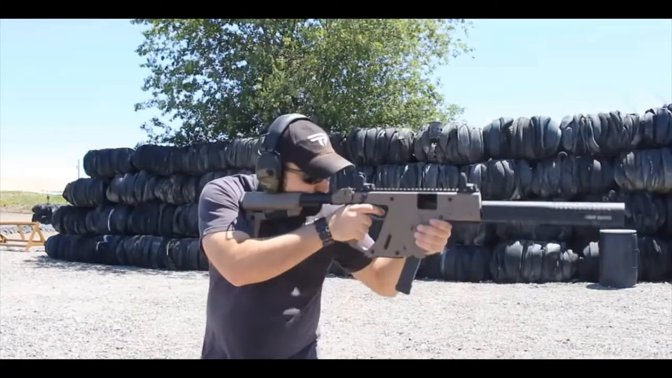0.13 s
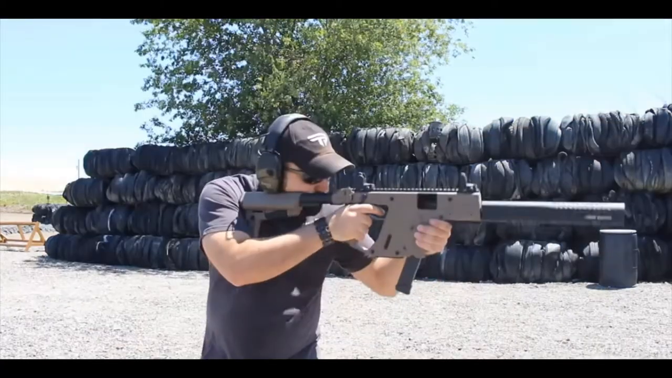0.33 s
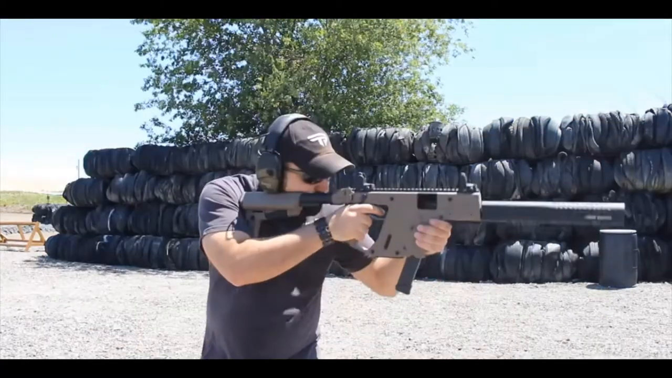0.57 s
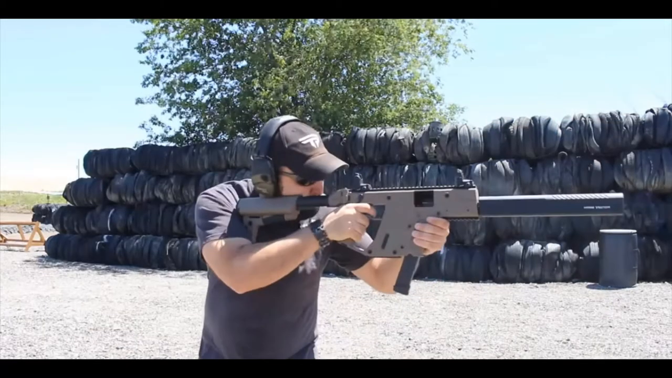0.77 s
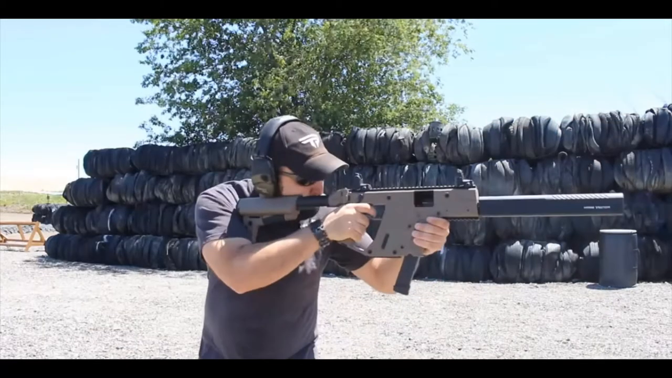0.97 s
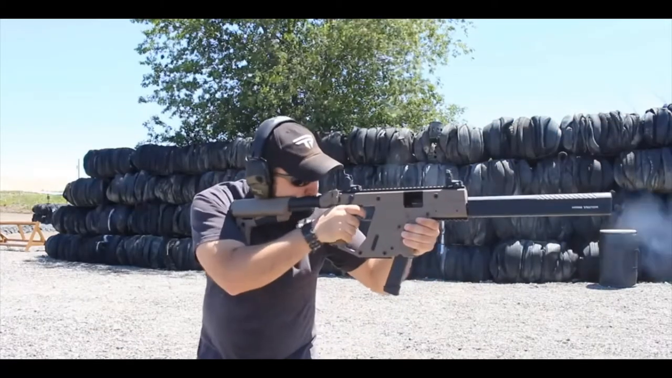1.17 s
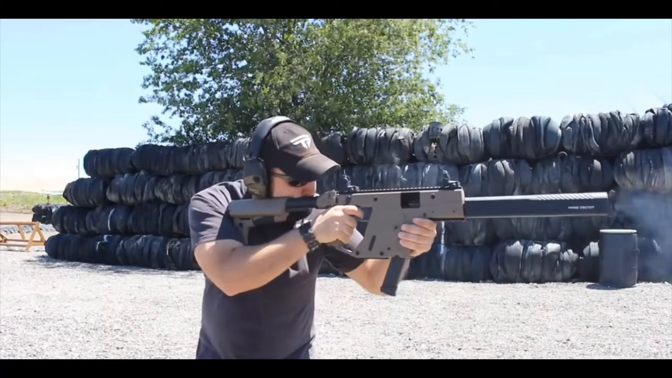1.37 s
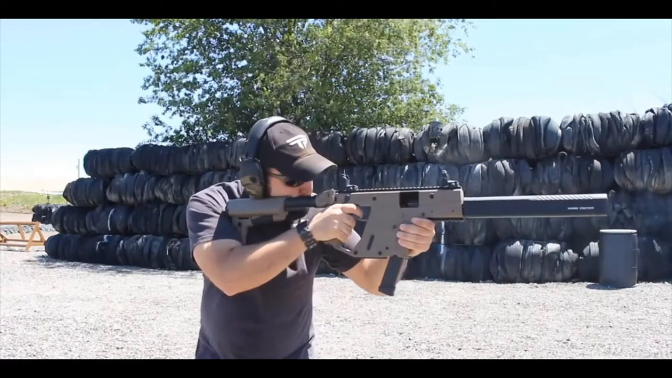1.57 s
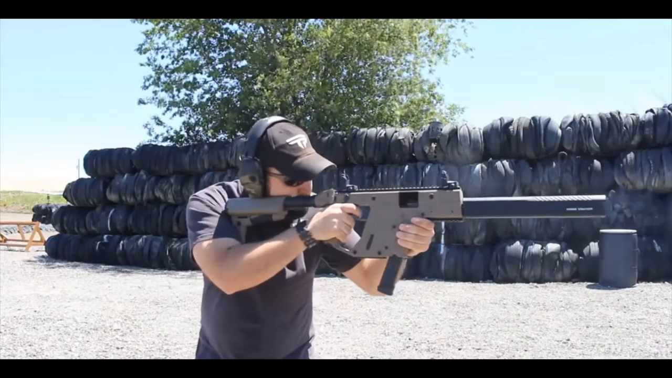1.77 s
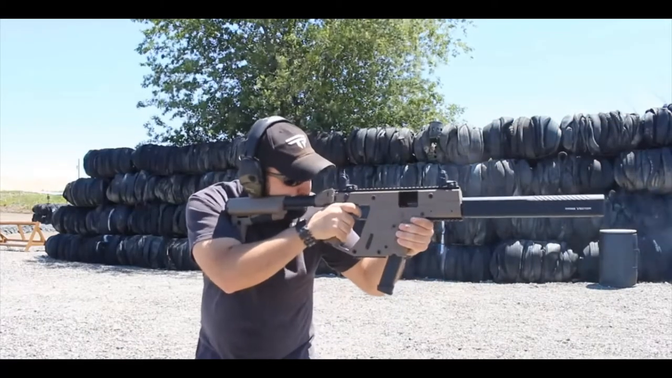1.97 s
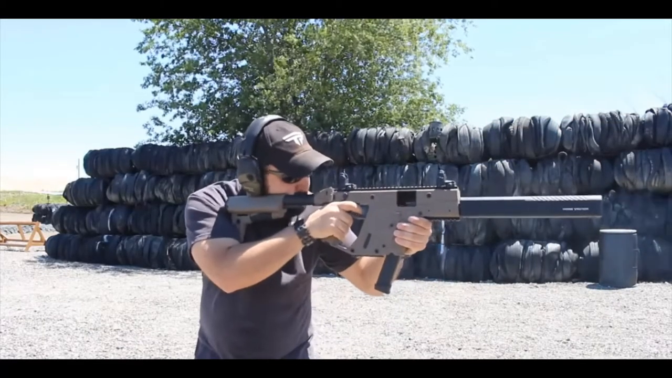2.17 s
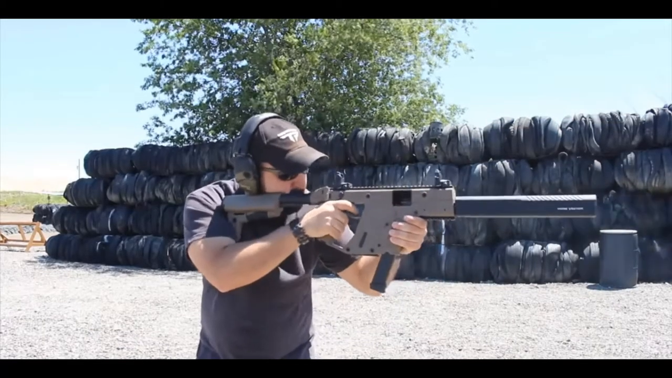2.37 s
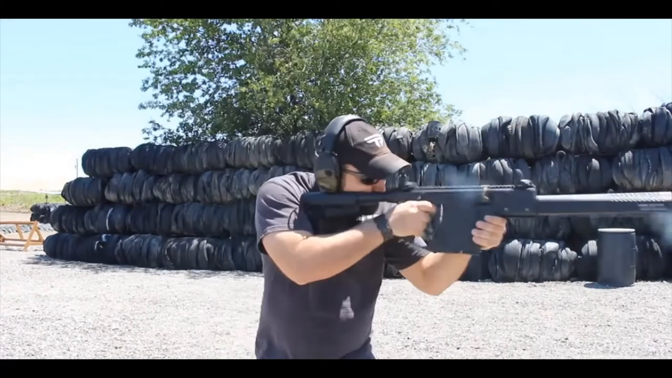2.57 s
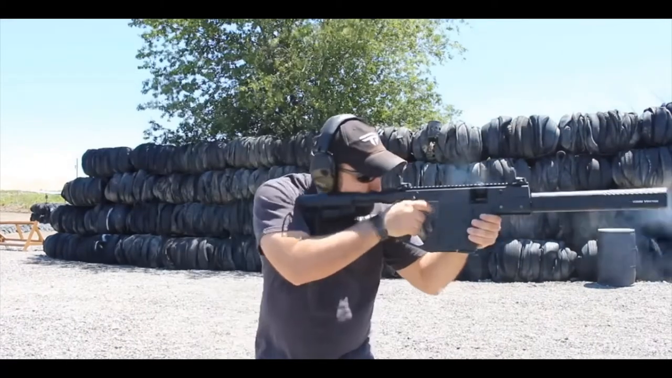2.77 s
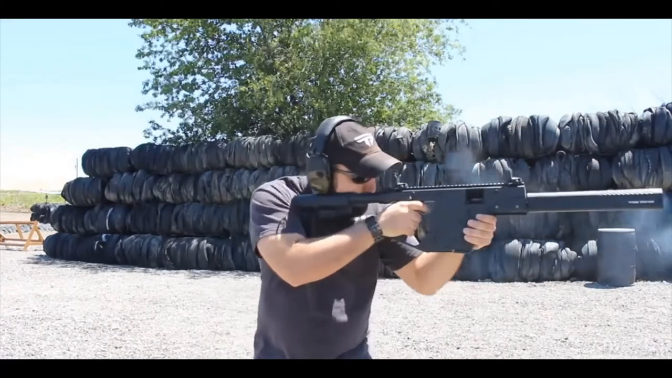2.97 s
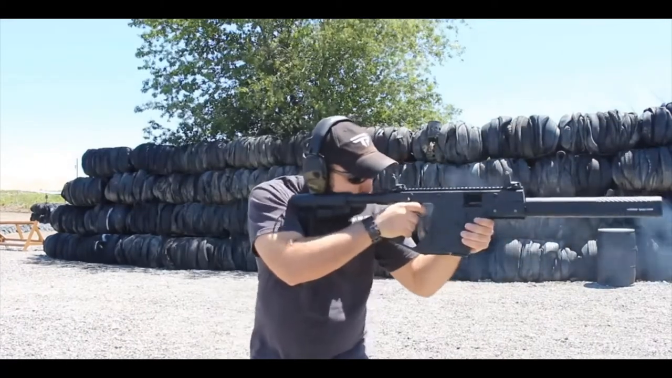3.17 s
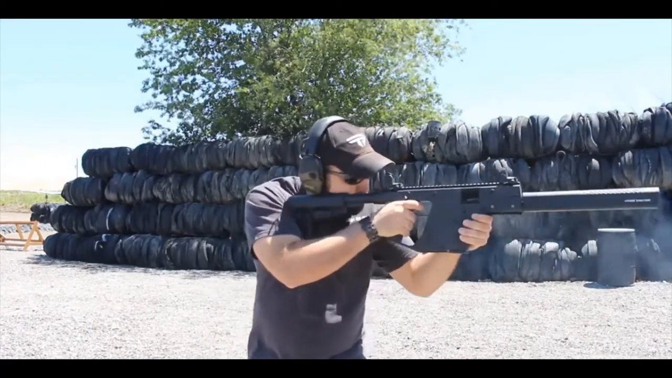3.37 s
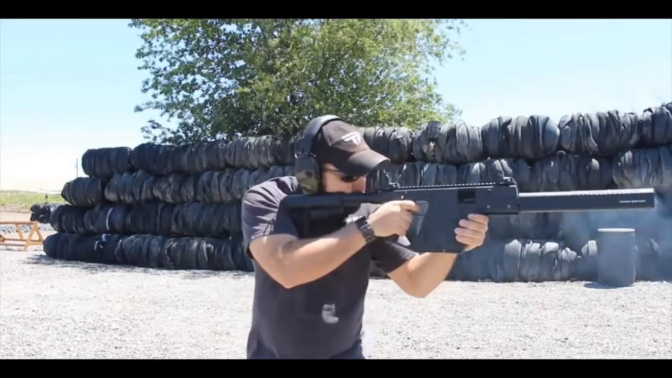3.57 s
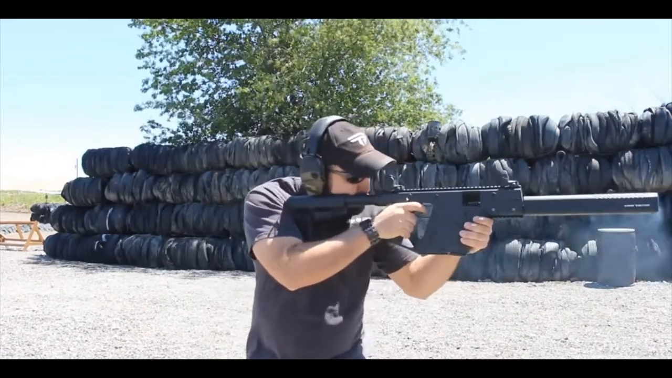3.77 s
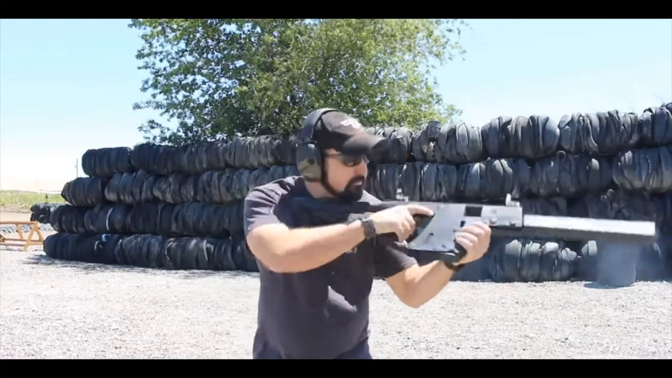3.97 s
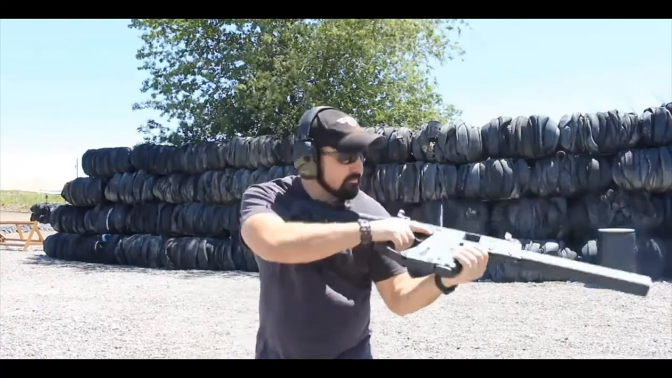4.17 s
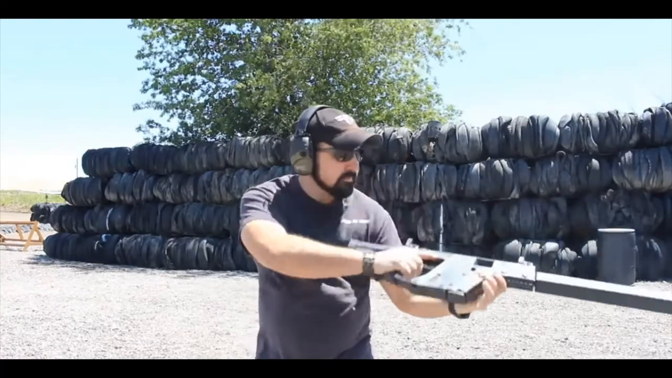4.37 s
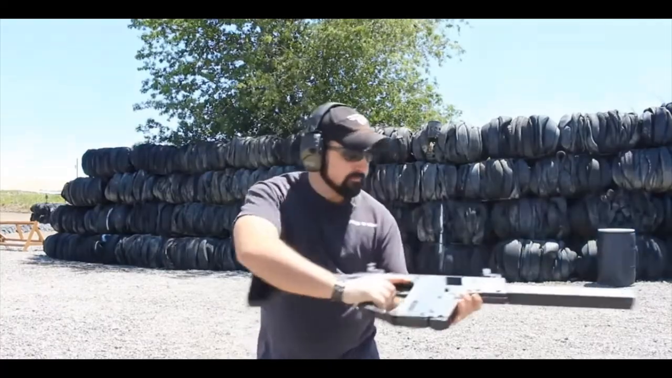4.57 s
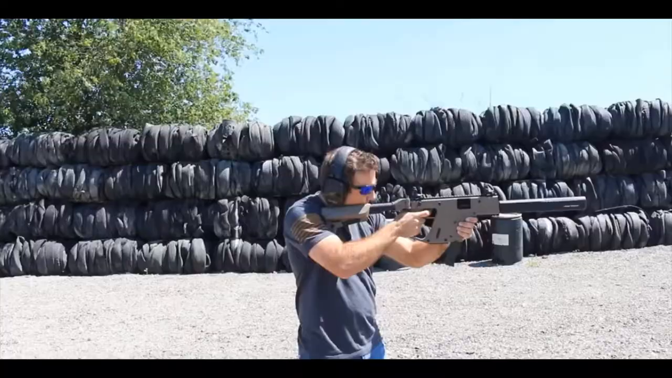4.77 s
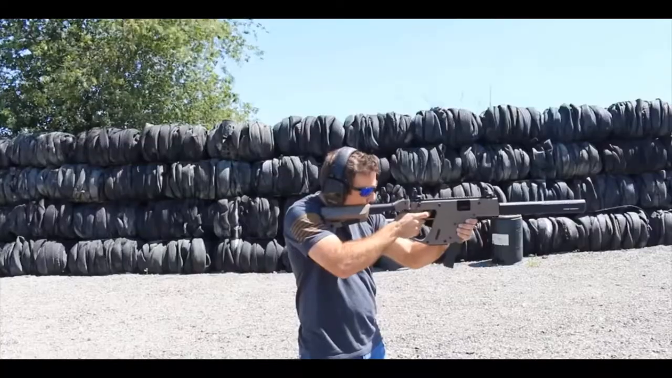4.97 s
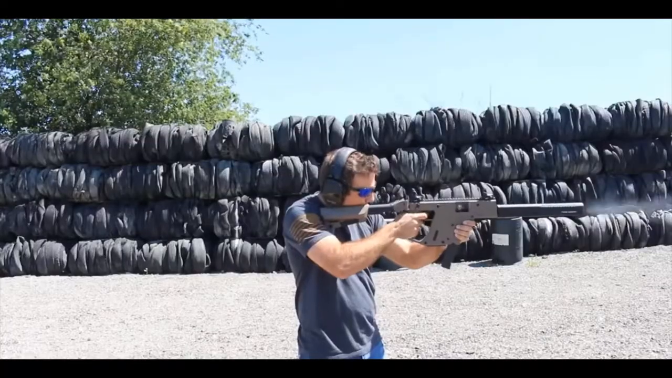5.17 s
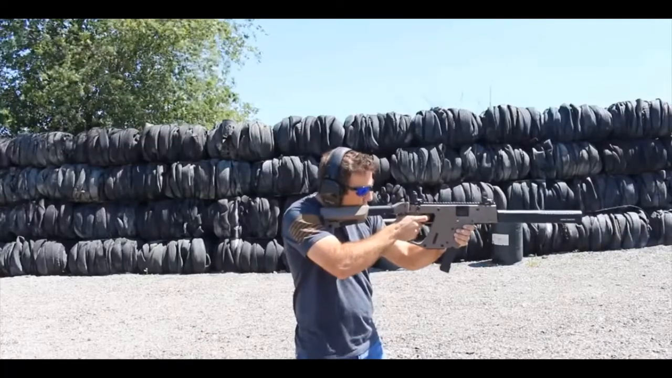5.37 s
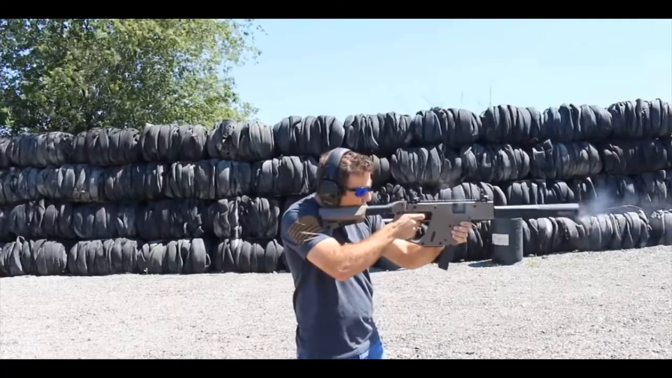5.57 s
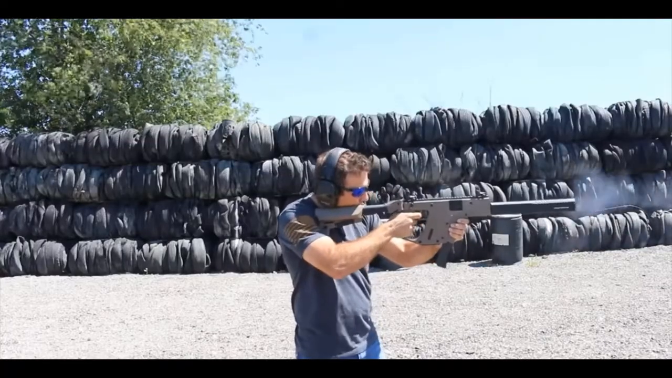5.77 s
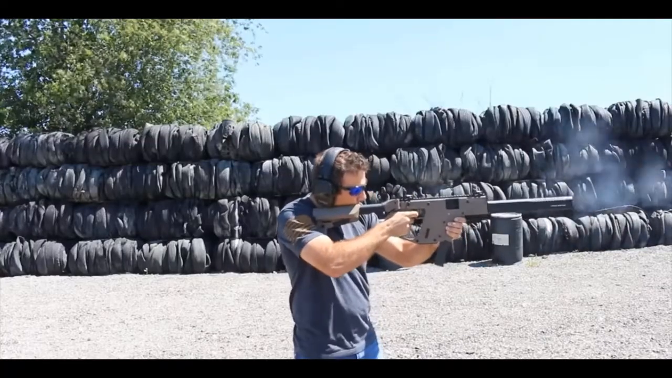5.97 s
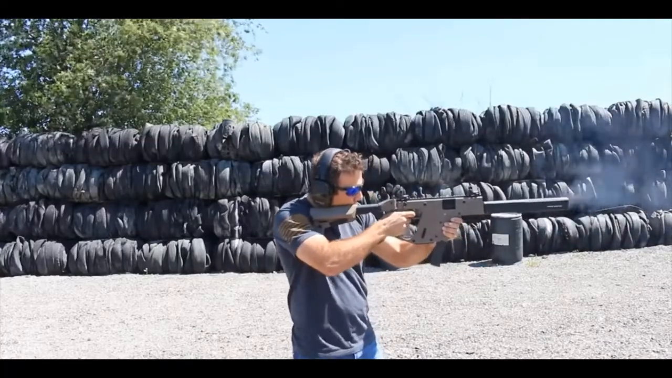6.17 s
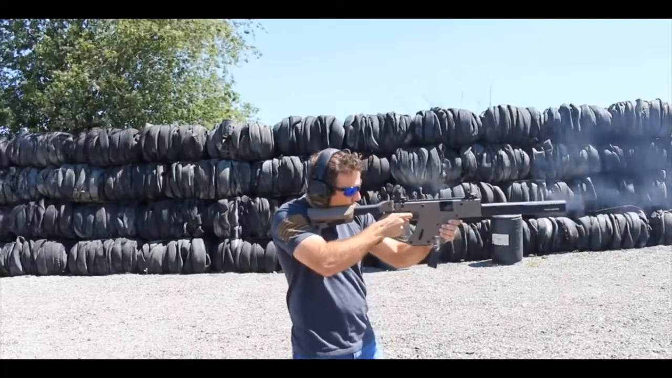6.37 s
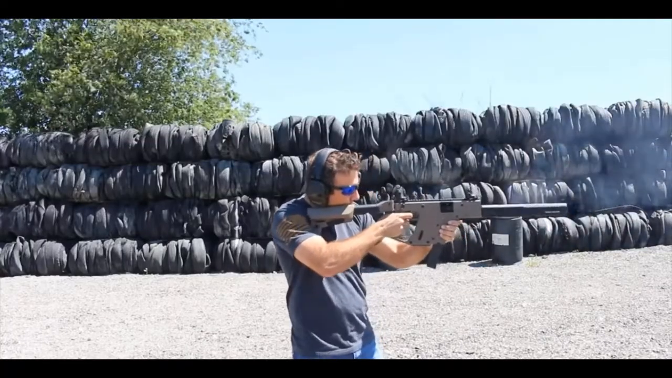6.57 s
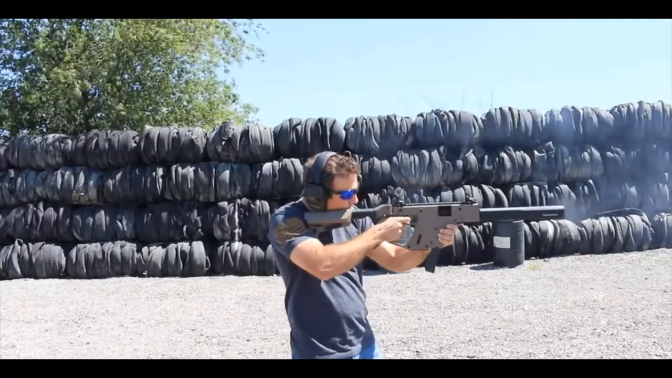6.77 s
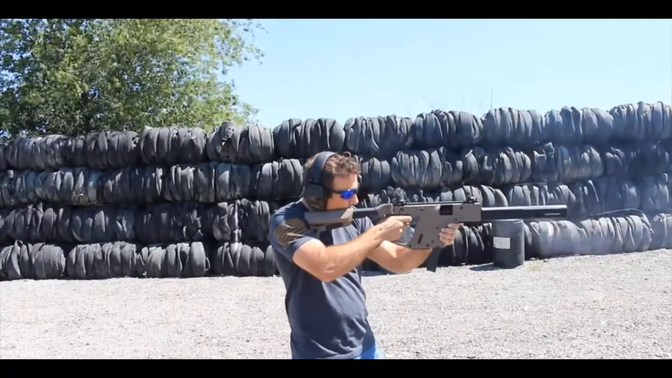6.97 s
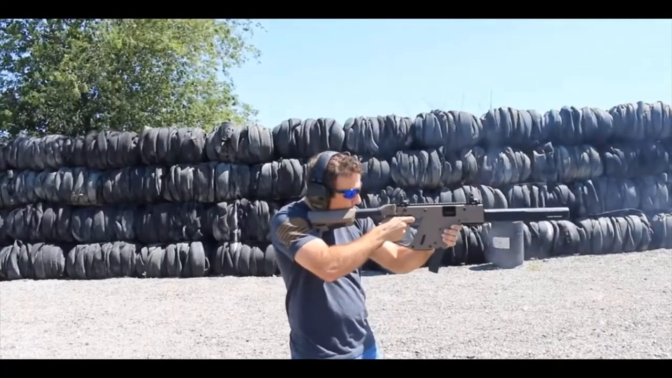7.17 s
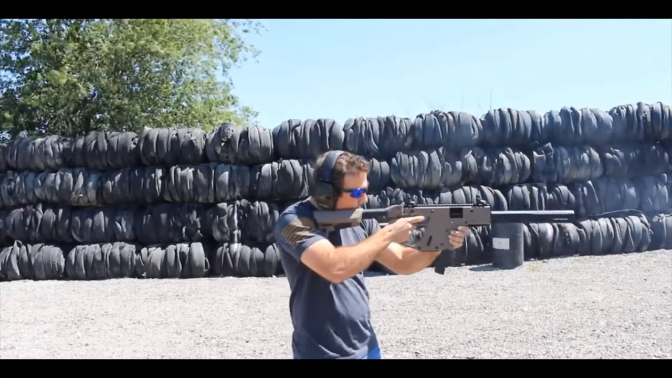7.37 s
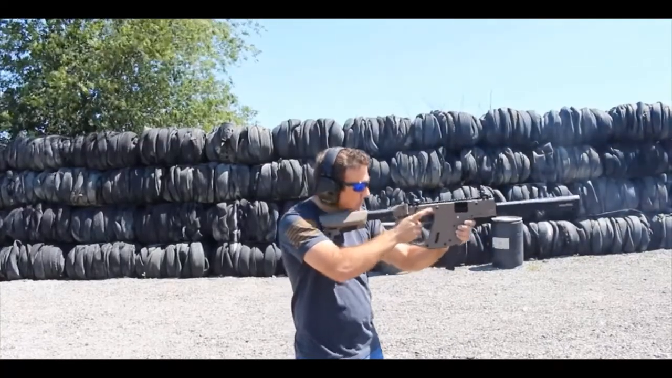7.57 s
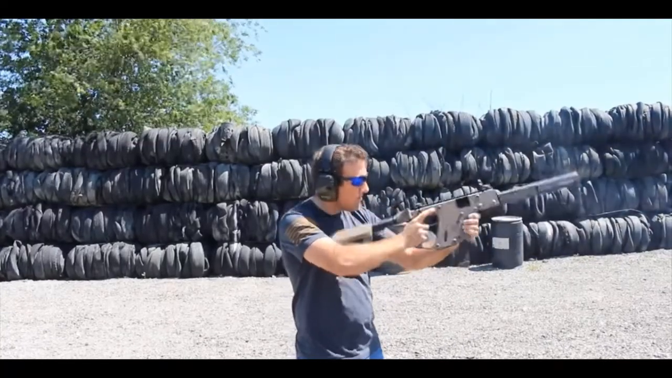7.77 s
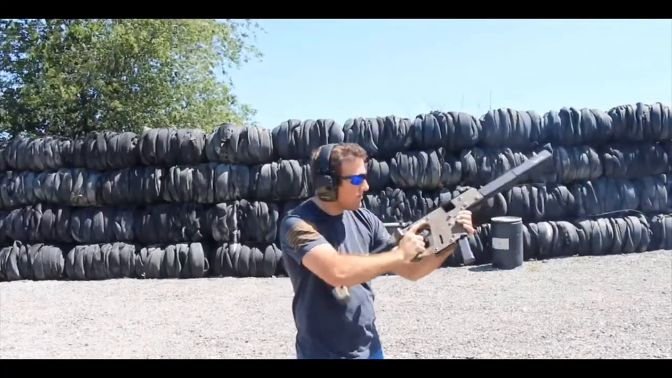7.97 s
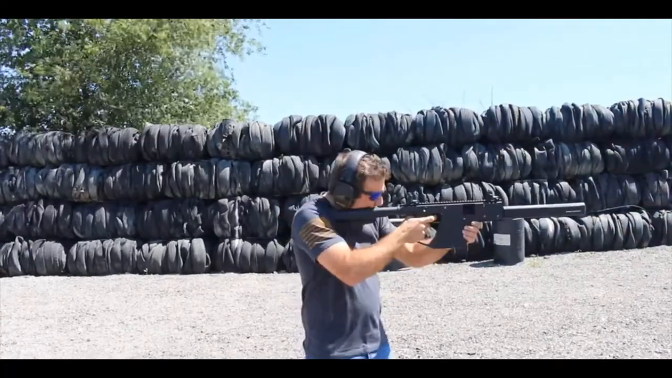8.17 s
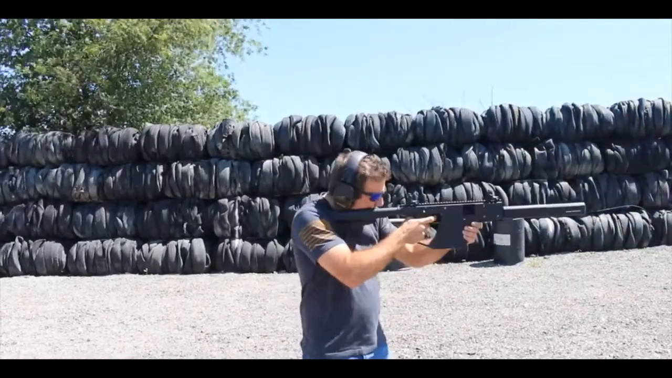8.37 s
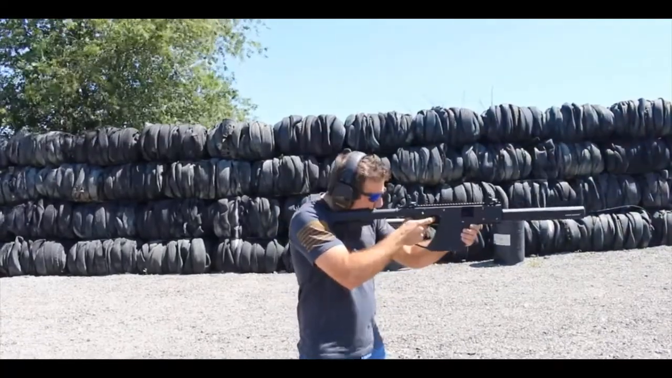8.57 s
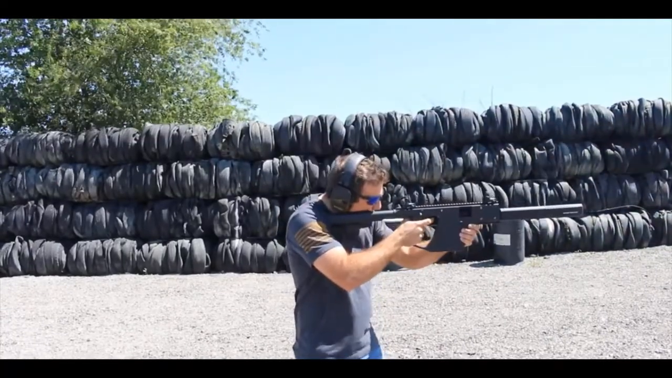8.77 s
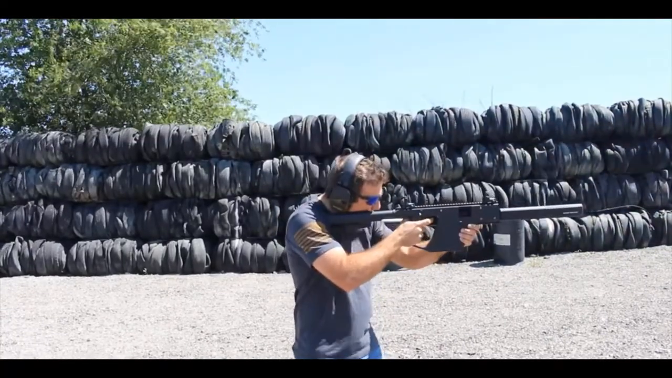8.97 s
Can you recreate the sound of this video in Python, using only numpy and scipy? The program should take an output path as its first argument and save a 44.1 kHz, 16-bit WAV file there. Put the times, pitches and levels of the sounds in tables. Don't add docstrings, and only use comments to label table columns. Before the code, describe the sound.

Close, clipped carbine blasts come in three steady strings, each shot a hard crack with dense wall echoes pumped almost as loud by automatic gain, choking off quickly before the next. Small metallic clicks and ringing cases fill the gap, open air hisses, and a distant tail rolls away. Near the end an empty magazine lands hollowly on gravel, then low gusts thud on the camera microphone, heard outdoors a few metres from the shooter.

```python
import sys
import numpy as np
from scipy import signal
from scipy.fft import rfft, irfft, next_fast_len
from scipy.io import wavfile
from scipy.ndimage import uniform_filter1d

SR = 44100
rng = np.random.default_rng(int(sys.argv[2]) if len(sys.argv) > 2 else 0)


def store_wav(level_fs):
    pcm = np.round(np.clip(np.atleast_2d(level_fs), -1, 1) * 32767)
    wavfile.write(sys.argv[1], SR, pcm.T.astype(np.int16))


def undo_db(level):
    steps = np.asarray(level, float) / 20
    return 10 ** steps


N = 397782

# t/s, peak level/dB, bass kick/dB, choke/dB, low-mid echo/dB
SHOTS = [(0.296, -8.5, 4.5, -32.5, -1.9), (0.487, -10.5, -2, -4.5, -2.2), (0.655, -8.5, -3.5, -1.5, -1.2),
         (0.823, -9.5, -3, -2, -1.8), (0.9903, -6.5, -14, 0.5, -1.8), (1.1626, -7, -3.5, -6, -2),
         (1.3381, -8.5, 5, -5.5, -2.1), (1.5135, -8.5, 2, -3.5, -2), (1.6901, -9, 1, 1, -1.8),
         (1.8646, -8.5, -1.5, 2.5, -3.1), (2.0282, -11, 10.5, -24, -1), (2.2051, -9, 8.5, -10, -0.5),
         (2.407, -10.5, 7.5, -17.5, -2.3), (2.738, -8.5, -1, -16, 0.6), (2.9254, -6.5, 3, -8.5, -0.5),
         (3.0839, -5.5, -2, -1, 0.4), (3.254, -6.5, -9, -1, .1), (3.423, -8.5, -5.5, -1.5, 0.6),
         (3.5816, -8, 1, -0.5, 1.2), (5.3496, -9, 5, -8, 1.3), (5.5784, -7, -3, -8.5, 1.1),
         (5.7724, -8, -6, -9, .1), (5.946, -9, -7, 0, 1.1), (6.1215, -9, -1, -1, 0.8),
         (6.305, -8, -5, -2.5, -1.2), (6.5066, -8.5, -2, 1.5, -0.4), (6.7079, -5.5, -5, -7.5, -0.2),
         (6.9029, -7.5, -7, -2, -0.7), (7.0973, -8, -3.5, 0, -0.5)]
AIM_DB = [-1.1, 0.51, -0.5, 0.3, -0.31, .1, .1, 1, .1, -0.12, -0.19, .1, .1, .1, 0.64, 0.3, .1, 0.41, -1.5,
          -0.38, .1, -0.57, -0.63, -1.5, 0.53, 0.38, 0.32, -0.41, -0.075]
# t after the blast/s, level/dB
SHOT_LIFE = [(0, 3), (0.014, -0.5), (0.027, 0.6), (.085, 1.67), (.14, 0), (0.169, -1.5), (.22, -12.5),
             (.32, -25.5), (0.601, -57)]
ANCHOR_HZ = [100, 550, 2500, 13000]
# f/Hz, level/dB per Hz
BLAST_COLOUR = [
    [(25, -13.5), (280, -2), (450, 1), (850, -7.5), (1330, -3.5), (1720, -8), (2200, -2.5), (3000, -5.5), (3550, -5), (3900, -12), (4900, -11), (6500, -8.5), (10700, -13), (16000, -18)],
    [(25, -10.5), (280, -2.5), (450, -1), (850, -8.5), (1330, -5), (1720, -9), (2300, -3), (3000, -4.5), (3550, -4.5), (3900, -10.5), (4900, -9.5), (6800, -7.5), (10700, -11), (16000, -14)],
]
# treble/dB, wall echo ceiling/dB, tail stretch
STRINGS = [
    (0.6, -7.5, 0.97),
    (-0.5, -9, 0.95),
    (-3, -7, 0.92),
]
KICK_DB = (-15, -22, -17)
KICK_LATE_S = (.0008, .0008, -.001)
# t/s, level/dB
HOLD_S = (.147, .147, .145)
RELEASE_DB = (-3, -6, -3)
TOP_DIES_DB_S = (139.5, 90, 100)
# t/s, width/s, bass level/dB, low-mid level/dB
SWELLS = [
    (.009, 0.0059, 15, 9),
    (0.067, 0.023, 4.5, 9.5),
]
# t after the blast/s, width/s, low-mid level/dB, treble level/dB
LULLS = [
    (0.039, 0.028, -1.5, -1),
    (0.12, 0.022, 4, -5.5),
    (0.05, 0.0097, 0, -1.5),
]
# t after the blast/s, level/dB, f/Hz
SLAPS = [
    [(.010, -10.5, 480), (.015, -19, 170), (.057, -8, 400), (.063, -5, 379.5), (.062, -19, 179), (.072, -15, 512), (.078, -12.5, 191.6), (.087, -11, 470), (.104, -12, 440), (.126, -5.5, 519), (.132, -18.5, 462), (.147, -18, 481.4)],
    [(.008, -10, 533), (.014, -8, 168.6), (.054, -7.5, 409), (.060, -2, 389), (.059, -2, 165.3), (.064, -11.5, 516), (.070, -22.5, 194), (.087, -4, 454), (.097, -12, 420), (.104, -18.5, 425), (.125, -12, 510), (.132, -9, 460), (.139, -5, 461)],
    [(.006, -13.5, 560), (.010, -9, 195), (.014, -14, 169.4), (.050, -11, 400), (.056, -7, 420), (.055, -21, 180), (.069, -20, 518), (.071, -10, 190), (.082, -9, 420), (.122, -19, 502), (.138, -16.5, 420)],
]
# t/s, peak level/dB, centre f/Hz, brass ring level/dB
TICKS = [(0.1425, -50, 2620, -24), (0.2673, -36, 3610, -24), (2.7076, -34, 2690, -31),
         (3.867, -29.5, 5600, -27), (3.893, -37, 2625, -22), (3.964, -40, 7800, -21),
         (4.139, -53, 5920, -13), (4.149, -49, 3100, -27), (4.226, -49.5, 6940, -27),
         (4.2372, -48, 6970, -19), (4.415, -40, 6700, -22), (4.423, -44, 6840, -16),
         (4.498, -55, 6830, -15), (4.562, -36, 6570, -28.5), (4.5713, -45, 6900, -17),
         (4.822, -61.5, 4100, -40.5), (6.6645, -15, 3350, -37), (6.679, -13.5, 3760, -37),
         (6.691, -16, 2570, -43), (7.2887, -18.5, 3700, -41), (7.298, -23, 8500, -44),
         (7.364, -62, 9100, 5), (7.422, -46, 2814, -47), (7.4823, -40.5, 8200, -11),
         (7.642, -31, 8950, -26.5), (7.695, -39, 2690, -36), (7.703, -50, 9500, -40),
         (7.8442, -55.5, 4670, -31.5), (7.8539, -56.5, 4390, 1), (7.9741, -53, 4560, -6),
         (8.109, -43, 3400, -29.5), (8.04, -55, 1500, -40), (4.476, -47, 3600, -33),
         (4.498, -52, 3300, -30), (8.149, -56, 2544, -36), (8.4, -56, 3380, -31), (8.418, -49, 7600, -30),
         (8.433, -52, 8200, -30), (8.466, -56, 7000, -30), (8.515, -58, 8000, 1), (8.481, -51, 3600, -30),
         (8.62, -63, 2900, -30), (8.6535, -51, 6500, -4), (8.71, -58, 7500, -30), (8.735, -57, 6000, -30),
         (8.848, -63.5, 6960, 2)]
# from t/s, f/Hz, t60/s
BRASS_HZ = [
    (0, 6982, .6),
    (5, 11410, .35),
    (7.95, 10880, .12),
    (8.05, 11410, .06),
    (8.5, 11050, .12),
    (8.6, 11700, .08),
]
# t/s, peak level/dB, centre f/Hz, t60/s
KNOCKS = [(0.206, -37, 484, 0.17), (.207, -47, 1230, 0.11), (.212, -56, 2220, 0.069),
          (3.91, -61, 2300, 0.33), (7.33, -56, 3200, 0.43), (.142, -70, 1400, .04), (3.83, -53, 480, 0.22),
          (7.358, -44, 239, 0.15), (4.474, -57.5, 1160, 0.11), (4.478, -58, 550, 0.053),
          (4.494, -61.5, 1260, .09), (4.497, -59, 560, .06), (3.868, -44, 1390, 0.037),
          (3.895, -45, 1370, 0.048), (4.108, -69, 1310, .05), (7.774, -63, 912, 0.02),
          (8.405, -56.5, 1190, 0.13), (8.426, -51.5, 454, 0.068), (8.464, -55, 814, 0.067),
          (8.54, -63, 1100, .08), (3.881, -41, 2300, 0.027), (4.073, -69, 2780, 0.036),
          (7.798, -51.5, 4550, 0.0097), (7.425, -51.5, 2900, .08), (7.44, -60, 3300, .05),
          (8.483, -57, 1300, 0.041), (8.652, -65, 1050, 0.044), (8.78, -59, 1400, .04),
          (8.855, -67, 1200, 0.037)]
# t/s, peak level/dB
MAGAZINE = [
    (7.63, -13),
]
# f/Hz, level/dB, t60/s
MAGAZINE_MODES = [(91.5, -10, 0.38), (311, -0.5, 0.26), (1126, -41, 0.35), (2261, -19, 0.055),
                  (2760, 3.5, 0.11), (3840, -26, 0.05), (4400, -2, 0.055), (5320, -24, 0.036),
                  (5663, -15, 0.097), (5943, -15.5, 0.046)]
# f/Hz, level/dB, t60/s
BOUNCE_MODES = [(2240, -11, 0.099), (2600, -11, 0.1), (3920, -9, 0.12), (5426, -12, 0.11),
                (5630, -8.5, 0.12), (6010, -11, 0.077), (1106, -16, .12)]
# t/s, peak level/dB, f/Hz, flutter level/dB
THUDS = [(2.054, -30, 172, -15), (2.439, -11, 99.6, -22), (2.447, -14, 199.5, -31), (4.089, -31, 120, -61),
         (4.139, -34, 110, -65.5), (6.15, -17, 251, -14), (6.353, -15, 132, -20), (8.153, -32.5, 89.4, -53),
         (8.366, -43.5, 106, -48), (8.451, -26, 131, -53), (8.55, -30, 101, -47), (8.614, -45, 139, -43),
         (8.651, -20, 106, -55), (8.665, -19, 118, -47), (8.697, -20, 91.5, -48), (8.732, -8, 141.6, -36),
         (8.752, -28, 153, -37), (8.782, -16, 102, -32.5), (8.795, -27, 118, -47), (8.806, -11, 121, -43),
         (8.831, -30, 96.5, -50), (8.848, -17, 170, -51), (8.864, -13, 99.6, -55), (8.952, -25, 70.2, -58)]
# t/s, rumble level/dB
GUST = [(0, -39), (.13, -52.5), (.28, -39.5), (2.66, -41.5), (3.8, -47.5), (4.1, -47), (4.46, -56.5),
        (4.52, -63.5), (4.83, -79), (4.87, -60.5), (7.6, -65), (8.14, -51), (8.16, -44), (8.34, -47),
        (8.5, -37.5), (8.63, -38), (8.8, -17), (9.02, -50.5)]
# from t/s, hiss level/dB, leaf rustle level/dB
SPOTS = [
    (0, -76.5, -73),
    (2.648, -71, -78),
    (2.74, -70.5, -76),
    (4.85, -64.5, -75),
    (7.3, -67.5, -74),
    (8.4, -61.5, -67),
    (8.79, -69.5, -75),
]
# f/Hz, level/dB per Hz
WIND = [(12, -51), (20, -24), (56, 1.5), (134, 7), (216, -6.5), (248, -7.5), (344, -15.5), (400, -23),
        (520, -36), (880, -120)]
AIR = [(150, -37), (250, -1.5), (373, -7), (460, -2), (800, -11), (1250, -8.5), (1750, -14), (2400, -11.5),
       (3000, -15.5), (3500, -16.5), (4800, -24), (7000, -19.5), (16000, -33)]
FAR_COLOUR = [(150, -8), (450, -1), (850, -12), (1300, -7), (1750, -14), (2400, 0), (3600, -7.5),
              (4900, -9.5), (7000, -12.5), (11000, -24.5)]
# f/Hz, width/octaves, level/dB
BODY = [(643, 0.11, -4.5), (821, 0.077, -5), (1050, 0.057, 1.5), (1720, 0.08, -3.5), (3100, 0.087, -3.5),
        (4910, 0.097, -4), (10680, 0.078, -5), (12800, 0.084, 2)]
# t/s, lines kept within this of the strongest/dB
STARVED = [(.351, 9), (1.009, 9), (1.739, 10), (2.122, 9), (2.271, 9), (2.950, 7), (3.098, 9), (3.724, 9),
           (4.190, 12), (4.362, 12), (4.897, 12), (5.024, 10), (5.217, 12), (5.259, 10), (5.407, 9),
           (5.537, 9), (5.962, 9), (6.129, 7), (6.175, 9), (6.368, 9), (6.478, 8), (6.773, 9), (7.136, 9),
           (7.351, 12), (7.713, 16), (7.840, 11), (7.918, 8), (8.075, 11), (8.350, 10), (8.609, 10)]
# from f/Hz, to f/Hz
BEST_LINE_BANDS = [(360, 560), (1050, 1250), (1270, 1500), (2080, 2330), (2520, 2950), (3330, 3680),
                   (6000, 7200), (8200, 9100), (13000, 15400)]
# t/s, from f/Hz, to f/Hz
GUTTED = [(1.009, 3100, 8200), (2.122, 3000, 7000), (2.271, 3000, 16000), (2.950, 3700, 15000),
          (2.950, 600, 2000), (5.962, 2400, 8200), (6.129, 3600, 13000), (6.129, 800, 2700),
          (6.368, 2400, 6700), (6.773, 2800, 8200), (.351, 2450, 3300)]
# t/s, half length/s, above f/Hz
HUSHED = [(.283, .008, 5000), (.814, .006, 4500), (.981, .006, 10500), (1.155, .005, 10000),
          (1.507, .005, 2500), (1.858, .004, 5000), (2.696, .008, 900), (2.732, .003, 900),
          (3.418, .003, 6500), (3.577, .003, 7500), (5.341, .005, 200), (5.571, .004, 6500),
          (6.111, .007, 9500), (6.298, .004, 7000), (6.500, .003, 5000), (6.895, .004, 7000),
          (7.619, .007, 600)]
TOP_HZ = (15850, 16800)
# t/s, from f/Hz, to f/Hz
APART = [
    (.878, 5600, 7000),
    (.901, 14400, 15900),
    (1.95, 4200, 5400),
    (5.435, 10300, 11800),
    (5.875, 4100, 5900),
    (5.875, 6800, 11200),
]

SPLICE_S = 2.648


def shape(x, table):
    size = next_fast_len(x.shape[-1])
    hz, db = np.transpose(table)
    f = np.log(np.fft.rfftfreq(size, 1 / SR) + 1)
    gain = undo_db(np.interp(f, np.log(hz), db, -90, -90))
    y = irfft(rfft(x, size) * gain, size)[:x.shape[-1]]
    return y / np.std(y)


def band(x, hz, width):
    return signal.lfilter(*signal.iirpeak(min(hz, .4 * SR), hz / width, SR), x)


def add(out, t, x):
    i = int(t * SR)
    out[i:i + len(x)] += x[:len(out) - i]


def walk(rate):
    k = int(SR / rate)
    return 1.3 * uniform_filter1d(np.repeat(rng.standard_normal(N // k + 1), k), k)[:N]


def noise(t):
    return rng.standard_normal(len(t))


def string_of(at):
    return int(at > 2.6) + int(at > 5)


def since_shot(t):
    fired = np.append(-9, np.transpose(SHOTS)[0])
    return t - fired[np.searchsorted(fired, t) - 1]


def scatter(size, spread_db):
    x = rng.standard_normal(size) * undo_db(spread_db * rng.exponential(size=size))
    return x / np.std(x)


def carbine():
    size = 24576
    out, t = np.zeros(N), np.arange(size) / SR
    f = np.log(np.fft.rfftfreq(size, 1 / SR) + 1)
    centres = np.log(50 * 2 ** np.arange(0, 8.5, .75))
    shares = [np.interp(f, centres, row) for row in np.eye(len(centres))]
    anchors = np.log(ANCHOR_HZ)
    weights = np.array([np.interp(centres, anchors, row) for row in np.eye(len(anchors))]).T
    spots = [rfft(shape(scatter(size, 2.0), c)) for c in BLAST_COLOUR]
    same = 0.44 * np.clip((np.log(3000) - f) / 1.9, 0, 1)
    for (at, db, bass_db, _, full_db), aim_db in zip(SHOTS, AIM_DB):
        string, who = string_of(at), int(at > 5)
        _, ceiling_db, stretch = STRINGS[string]
        echo_db = ceiling_db - db
        own = rfft(shape(scatter(size, 2.2), BLAST_COLOUR[who]))
        wave = np.sqrt(same) * spots[who] + np.sqrt(1 - same) * own
        late = np.clip((t - .012) / 0.0067, 0, 1)
        age = t / (1 + (stretch - 1) * late)
        level = blast_levels(t, age, string) + echo_db * late
        level[1:3] += np.outer((full_db, aim_db), late)
        patches = 1.6 * rng.standard_normal((len(centres), 33))
        shot = np.zeros(size)
        for weight, share, patch in zip(weights, shares, patches):
            band_db = weight @ level + np.interp(t, np.arange(33) / 40, patch)
            shot += undo_db(band_db) * irfft(wave * share, size)
        shot += undo_db(KICK_DB[string] + 10.5 + bass_db) * heave(np.maximum(t - KICK_LATE_S[string], 0))
        for lag, slap_db, hz in SLAPS[string]:
            near = t[:512] - t[256] - 0.00023 * rng.standard_normal()
            add(shot, lag - t[256], undo_db(echo_db + slap_db) * lump(near, hz, .8))
        if at < SPLICE_S:
            shot *= np.clip((SPLICE_S - at - t) / 0.0049, 0, 1)
        out[int(at * SR):] *= undo_db(-6)
        add(out, at - .001, undo_db(db - 7.0) * shot * np.minimum(t / 0.0019, 1))
    return out


def blast_levels(t, age, string):
    swells = [np.outer((b, m), np.exp(-((age - s) / w) ** 2)) for s, w, b, m in SWELLS]
    bass, low_mid = sum(swells)
    bass = bass - 9 - 43 * np.clip(age - .07, 0, .1) - 2.5
    low_mid = low_mid - 4 + 3 * np.clip(age / 0.065, 0, 1)
    low_mid -= np.exp(-((age - .055) / 0.0049) ** 2)
    mid = 3 * np.exp(-((age - .058) / 0.026) ** 2)
    treble = np.maximum(3 - 98.5 * age, -22.5) + STRINGS[string][0]
    since_hold = age - HOLD_S[string]
    treble = treble - TOP_DIES_DB_S[string] * np.clip(since_hold, 0, .04)
    level = np.array([bass, low_mid, mid, treble]) + np.interp(age, *np.transpose(SHOT_LIFE))
    level += RELEASE_DB[string] * np.clip(since_hold / 0.016, 0, 1)
    lull_s, width, low_db, high_db = LULLS[string]
    level[1:] += np.outer((low_db, high_db, high_db), np.exp(-((t - lull_s) / width) ** 2))
    return level


def heave(t):
    phase = 2 * np.pi * (38 * t + 700 * .0055 * (1 - np.exp(-t / .0055))) + 1.
    return np.cos(phase) * (t / .0115) ** 2 * np.exp(2 - 2 * t / .0115 - (t / .027) ** 4)


def lump(t, hz, turns):
    return np.cos(2 * np.pi * hz * t + 0.45) * np.exp(-(t * hz / turns) ** 2)


def magazine():
    out, t = np.zeros(N), np.arange(SR // 2) / SR
    (at, db), = MAGAZINE
    body = sum(undo_db(g - 60 * t / t60) * np.sin(2 * np.pi * hz * t) for hz, g, t60 in MAGAZINE_MODES[:3])
    body *= 1 - np.exp(-(t / 0.023) ** 2)
    body *= np.exp(-(t / 0.17) ** 3)
    thud = band(noise(t), 120, 120) * undo_db(6.0 - 60 * t / 0.19)
    body += thud * (1 - np.exp(-t / 0.0051))
    crack = noise(t) * undo_db(-60 * t / 0.036)
    shell_gains = (990, 1.06), (2330, 3.3), (2700, 1.1), (3800, 1.6), (5750, 0.6)  # Hz, gain
    shell = sum(g * band(band(crack, hz, 590), hz, 1060) for hz, g in shell_gains)
    shell += 0.12 * band(crack, 6700, 11000)
    add(out, at, undo_db(db - 2.5) * body + undo_db(db + 2.5) * shell)
    bounce = sum(undo_db(g - 60 * t / min(t60, .1)) * np.sin(2 * np.pi * hz * t) for hz, g, t60 in BOUNCE_MODES)
    add(out, at + .063, undo_db(db - 24) * bounce)
    return out


def gravel():
    out, t = np.zeros(N), np.arange(SR // 3) / SR
    for at, db, hz, ring_db in TICKS:
        t60 = 0.031 * (3500 / hz) ** .4
        burst = noise(t) * undo_db(-60 * t / max(t60, .004))
        tick = 1.5 * band(band(burst, hz, 0.7 * hz), hz, 0.59 * hz)
        tick += 0.16 * band(burst, 6700, 11000)
        tick += (0.9 if hz < 5000 else 0.45) * band(burst, 3200, 4000)
        add(out, at, undo_db(db) * (tick + brass(t, at, ring_db)))
    for at, db, hz, t60 in KNOCKS:
        t60 = max(t60, .01)
        burst = noise(t) * undo_db(-60 * t / t60)
        knock = 16.6 * band(band(burst, hz, .5 * hz), hz, .5 * hz)
        echo = band(band(noise(t), 2600, 3500), 2600, 7000) * undo_db(-60 * t / (6.5 * t60))
        add(out, at, undo_db(db) * (knock + 0.5 * echo + 4.9 * lump(t - 0.88 / hz, hz, 1.0)))
    return out


def brass(t, at, ring_db):
    wobble = uniform_filter1d(noise(t), size=300) * (40 + 30 * (at > 5))
    _, hz, t60 = [row for row in BRASS_HZ if row[0] <= at][-1]
    ring = np.sin(2 * np.pi * hz * t + wobble / 8) * undo_db(-60 * t / t60)
    overtone = np.sin(2 * np.pi * 11450 * t + wobble) * undo_db(-6.5 - 60 * t / 0.16)
    return (ring + overtone * (at < 5)) * undo_db(ring_db + wobble) * (at > 3.8)


def thuds():
    out, t = np.zeros(N), np.arange(SR // 10) / SR
    for at, db, hz, flutter_db in THUDS:
        flutter = band(band(noise(t), 250, 440), 400, 780) * np.exp(-((t - .018) / 0.0094) ** 2)
        push = undo_db(db - 1.5) * lump(t - .02, hz, .6)
        add(out, at - .014, push + undo_db(min(flutter_db, -24) + 14) * flutter)
    return out


def outdoors():
    t = np.arange(N) / SR
    wind_db = np.interp(t, *np.transpose(GUST))
    start, hiss_db, rustle_db = np.transpose(SPOTS)
    spot = np.clip(np.searchsorted(start, t) - 1, 0, None)
    who = (t > 5).astype(int)
    far_start_db, far_t60 = np.take((-39, -33), who), np.take((0.97, 0.85), who)
    far_db = far_start_db - 60 * since_shot(t) / far_t60
    far_db -= 40 * ((t > SPLICE_S) & (t < SPLICE_S + .1))
    leaf_db = np.maximum(rustle_db[spot], far_db - 14)
    lumps = walk(30)
    wind = shape(noise(t), WIND) * undo_db(wind_db + 1.6 * lumps)
    buffet = band(band(band(noise(t), 320, 220), 320, 340), 360, 340)
    buffet = buffet / np.std(buffet) * undo_db(1.3 * wind_db - 10.0 + 3.0 * np.tanh(lumps))
    air = shape(noise(t), AIR) * undo_db(hiss_db[spot] + 3.0 + walk(1.9))
    wind_floor = undo_db(-66.5) * shape(noise(t), WIND)
    far = undo_db(far_db + 2.0 * walk(27)) * shape(noise(t), FAR_COLOUR)
    leaves = band(band(scatter(N, 0.99), 8000, 7900), 9000, 11000)
    leaves = leaves / np.std(leaves) * undo_db(leaf_db - 4.0 + walk(22))
    return wind + buffet + air + wind_floor + far + leaves


def scene():
    return np.tile(carbine() + gravel() + magazine() + thuds() + outdoors(), (2, 1))


def camera_body(x):
    size = next_fast_len(N)
    octave = np.log2(np.fft.rfftfreq(size, 1 / SR) + 1)
    gain_db = sum(db * np.exp(-((octave - np.log2(hz)) / w) ** 2) for hz, w, db in BODY)
    return irfft(rfft(x, size) * undo_db(gain_db), size)[:N]


def flicker(x):
    f, _, z = signal.stft(x, SR, nperseg=1024)
    f = f[:, None]
    power = uniform_filter1d(abs(z) ** 2, size=4, axis=0)
    weak = power <= np.max(power[40:], axis=0) * undo_db(-2 * 36.)
    flecks = np.repeat(rng.standard_normal((33, z.shape[1])), 16, axis=0)[:len(f)]
    grain = np.repeat(rng.standard_normal((257, z.shape[1])), 2, axis=0)[:len(f)]
    z = z * undo_db(1.5 * flecks * np.clip(f / 4000 - .4, 0, 1))
    z = z * undo_db(2 * grain * (f > 300))
    return signal.istft(z * (~weak | (f < 4000)), SR, nperseg=1024)[1][:N]


def choke(x):
    dip_db, t = np.zeros(N), np.arange(SR // 20) / SR
    for at, _, _, choke_db, _ in SHOTS:
        dip_s = (.0152, .016, .015)[string_of(at)]
        add(dip_db, at, choke_db * np.exp(-((t - dip_s) / .0038) ** 2))
    high = signal.sosfiltfilt(signal.butter(3, 500, "high", fs=SR, output="sos"), x)
    return x - high * (1 - undo_db(np.minimum(dip_db, 0)))


def starve(x):
    size = 1536
    w, k = np.sin(np.pi * (np.arange(size) + .5) / size), np.arange(size // 2 + 1)
    edges = np.array(BEST_LINE_BANDS) * size // SR
    for at, keep_db in STARVED:
        i = int(at * SR) - size // 2
        z = rfft(w * x[i:i + size])
        heard = abs(z) * k ** .28
        strongest = np.max(heard[12:])
        best = np.zeros(len(k), bool)
        for lo, hi in edges:
            j = lo + np.argmax(heard[lo:hi])
            best[j - 1:j + 2] = heard[j] > strongest * undo_db(-1.3 * keep_db)
        keep = best | (heard > strongest * undo_db(-.15 * keep_db)) | ((k < 5) & (keep_db > 8.5))
        for lost_s, lo, hi in GUTTED:
            keep[lo * size // SR:hi * size // SR] &= lost_s != at
        change = np.interp(k, (8, 10, 60), (1, 1.6, 1.7)) * keep - .93
        x[i:i + size] += w * irfft(z * change, size)
    for at, half, hz in HUSHED:
        i = int(at * SR) - size // 2
        high = signal.sosfiltfilt(signal.butter(4, hz, "high", fs=SR, output="sos"), x[i:i + size])
        x[i:i + size] -= high * np.exp(-((np.arange(size) - size / 2) / SR / half) ** 6)
    steady, attack = (signal.sosfiltfilt(signal.ellip(8, .2, 40, hz, fs=SR, output="sos"), x) for hz in TOP_HZ)
    return steady + (attack - steady) * np.exp(-(since_shot(np.arange(N) / SR) / .009) ** 2)


def apart(x):
    side, t = np.zeros(N), np.arange(N) / SR
    for at, lo, hi in APART:
        near = slice(int((at - .05) * SR), int((at + .05) * SR))
        bandpass = signal.ellip(5, .5, 60, (lo, hi), "band", fs=SR, output="sos")
        late = signal.sosfilt(bandpass, np.roll(x, 300)[near])
        side[near] += undo_db(-4) * late * np.exp(-((t[near] - at) / .014) ** 4)
    return np.array([x + side, x - side])


def low_pass(x):
    return signal.sosfilt(signal.butter(12, 16980, fs=SR, output="sos"), x)


def record(dry):
    rounded = np.tanh(1.554 * camera_body(dry[0])) / 1.775
    mix = apart(starve(choke(flicker(rounded))))
    return low_pass(mix)


dry = scene()
out = record(dry)
store_wav(out)
```